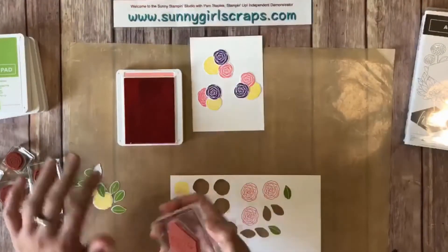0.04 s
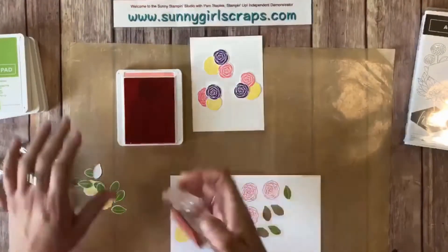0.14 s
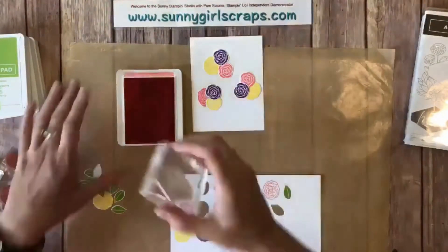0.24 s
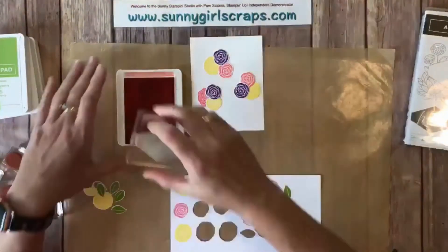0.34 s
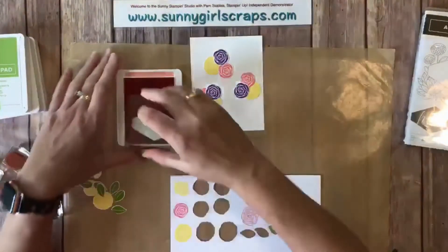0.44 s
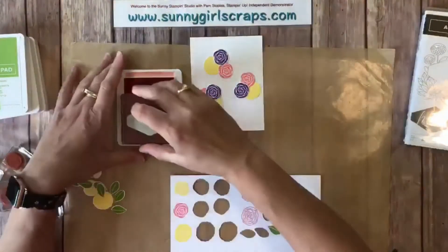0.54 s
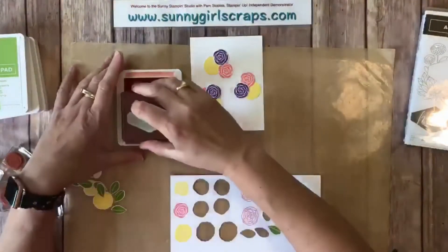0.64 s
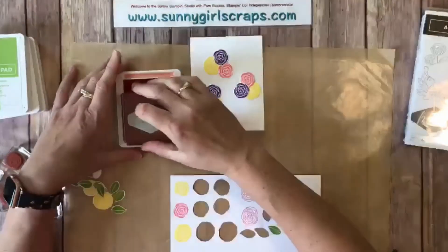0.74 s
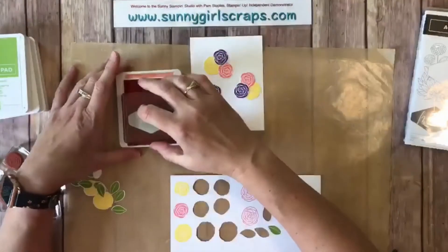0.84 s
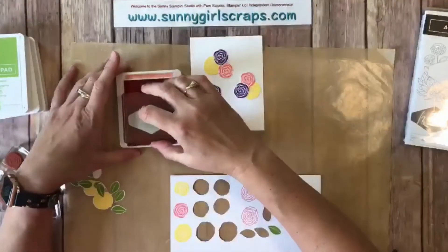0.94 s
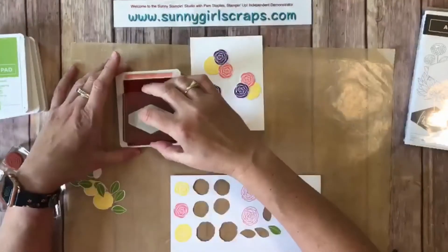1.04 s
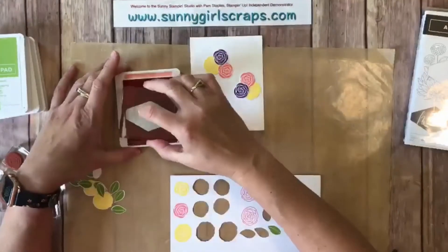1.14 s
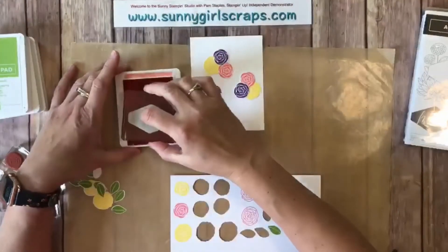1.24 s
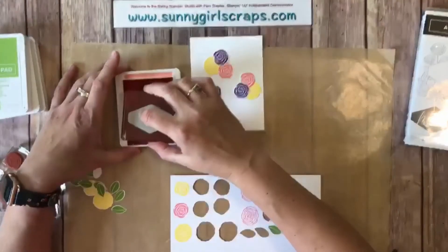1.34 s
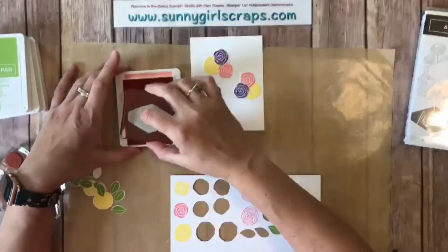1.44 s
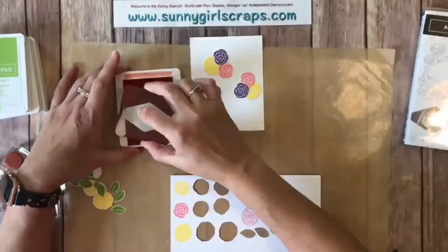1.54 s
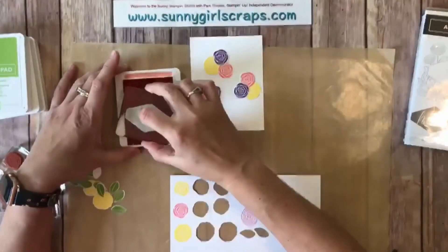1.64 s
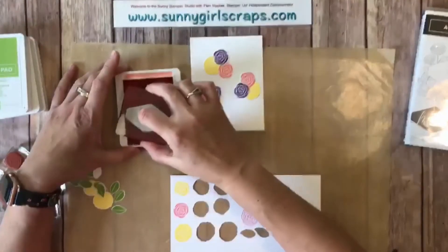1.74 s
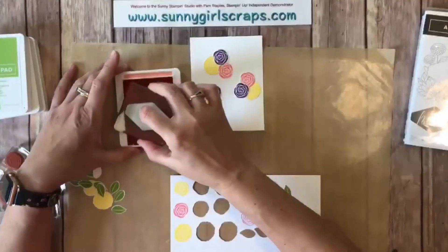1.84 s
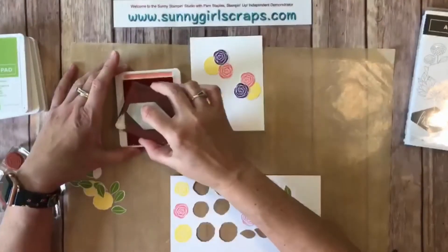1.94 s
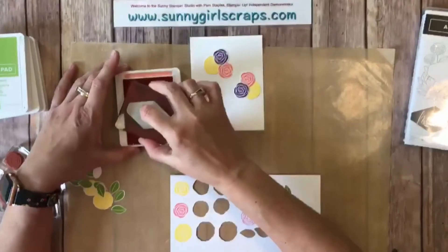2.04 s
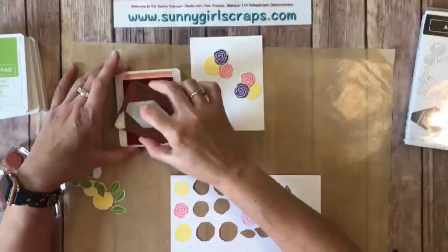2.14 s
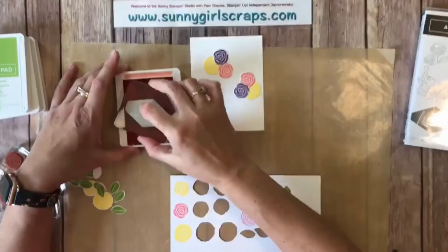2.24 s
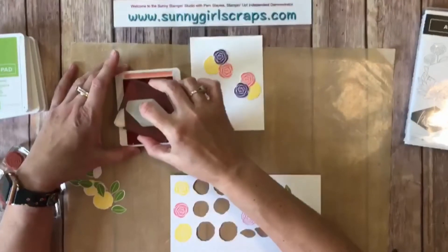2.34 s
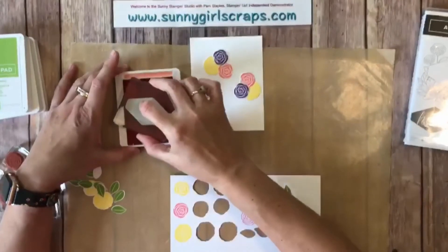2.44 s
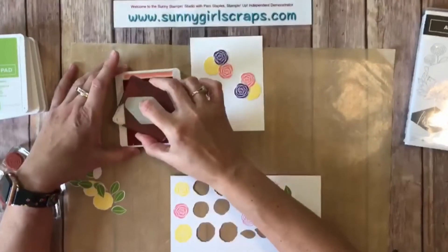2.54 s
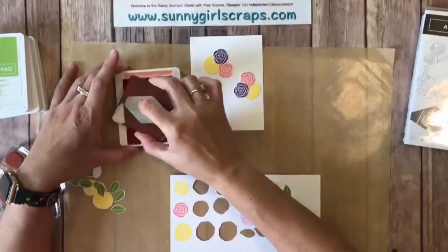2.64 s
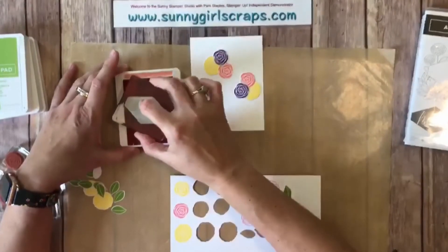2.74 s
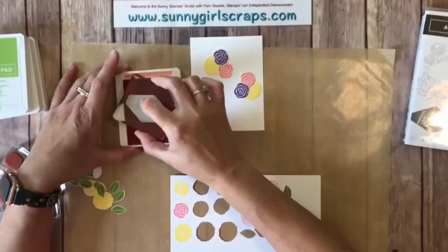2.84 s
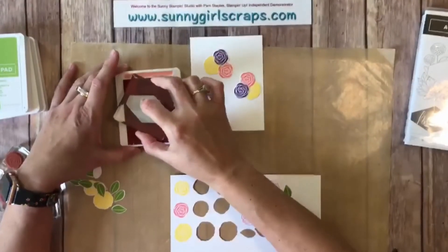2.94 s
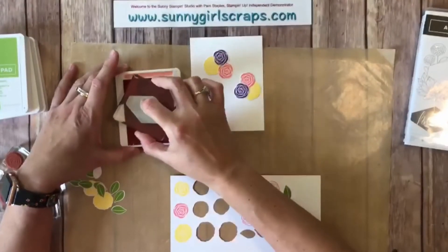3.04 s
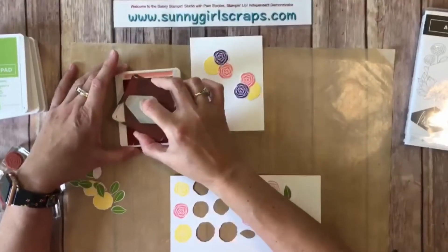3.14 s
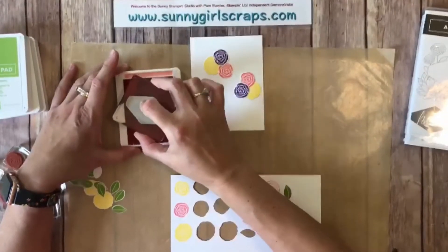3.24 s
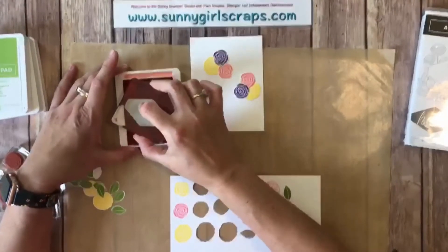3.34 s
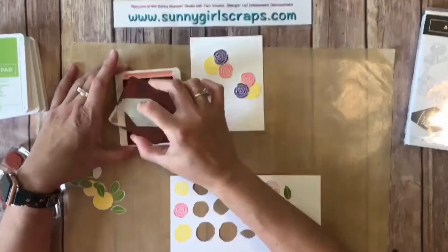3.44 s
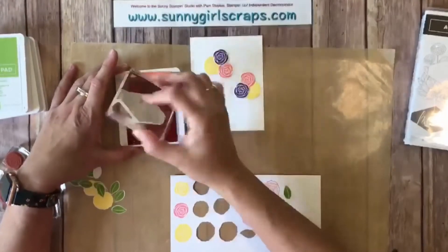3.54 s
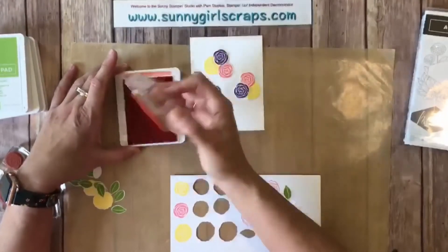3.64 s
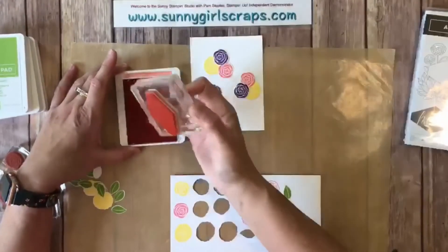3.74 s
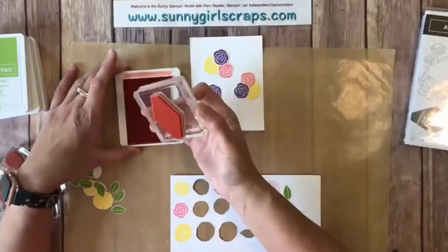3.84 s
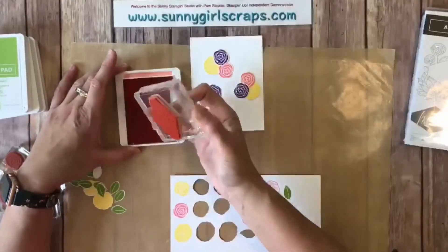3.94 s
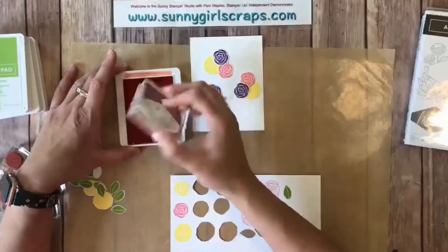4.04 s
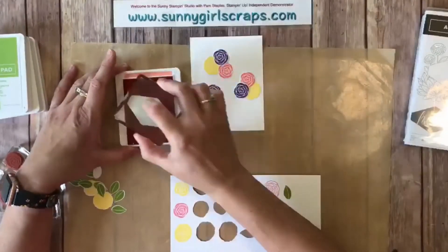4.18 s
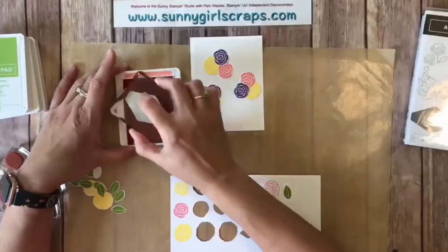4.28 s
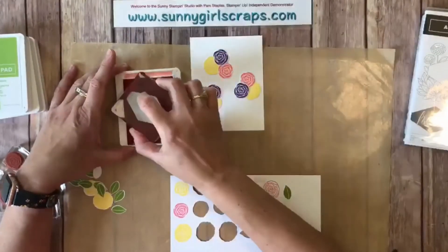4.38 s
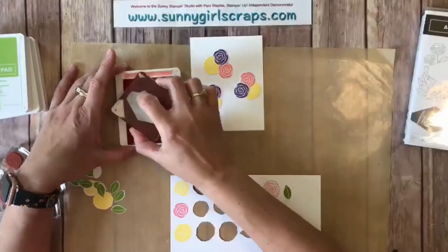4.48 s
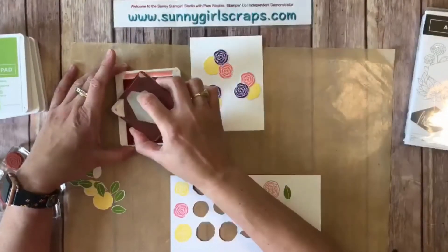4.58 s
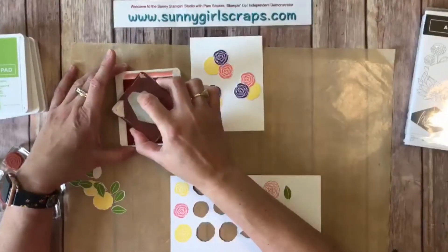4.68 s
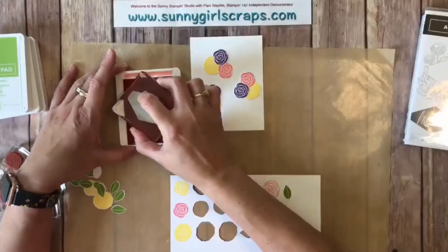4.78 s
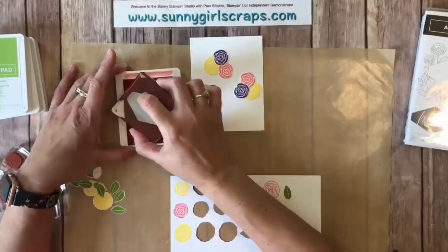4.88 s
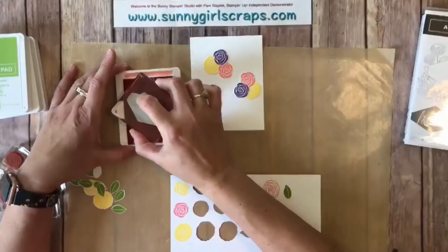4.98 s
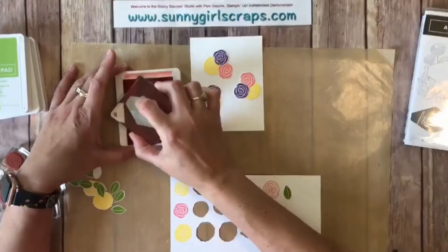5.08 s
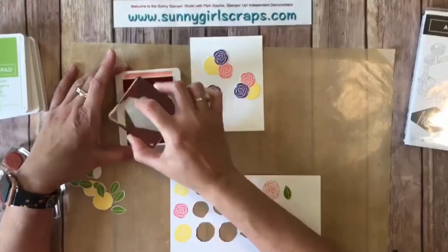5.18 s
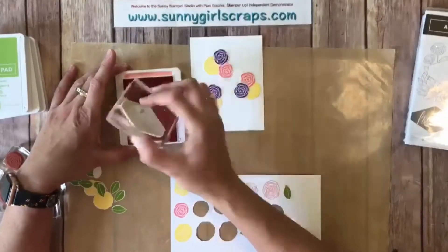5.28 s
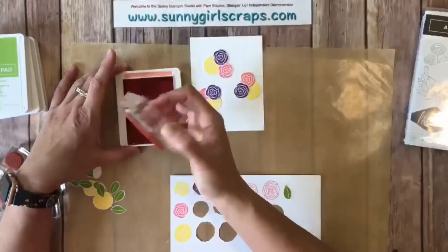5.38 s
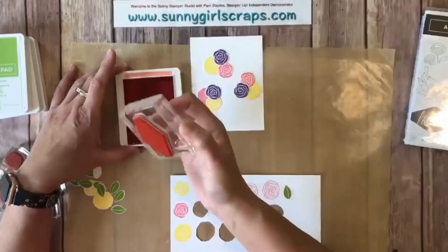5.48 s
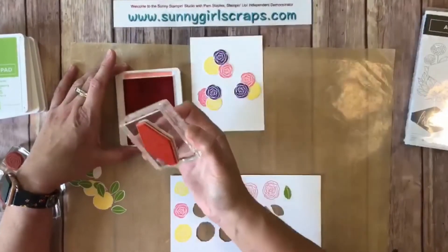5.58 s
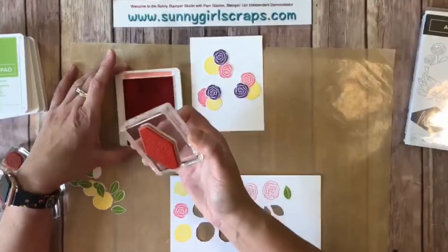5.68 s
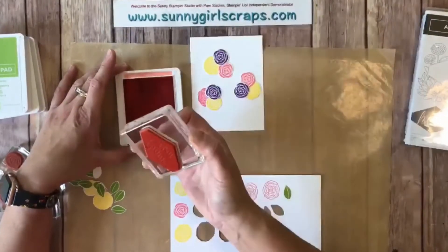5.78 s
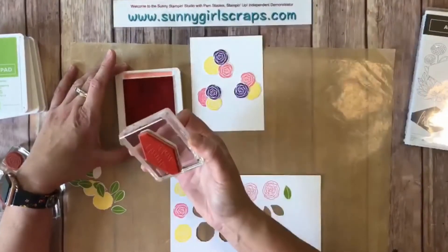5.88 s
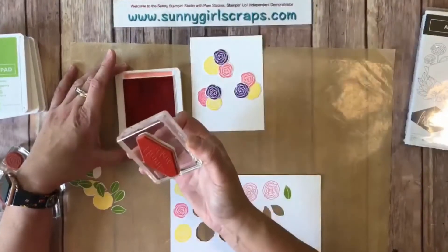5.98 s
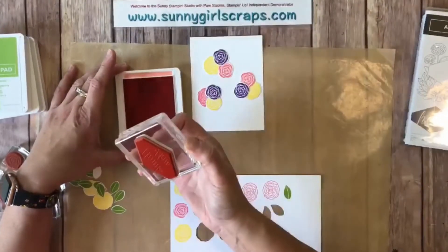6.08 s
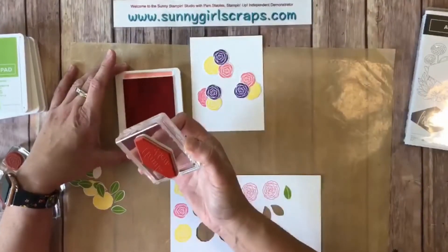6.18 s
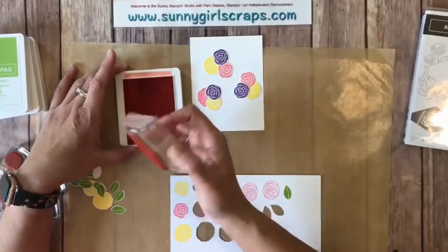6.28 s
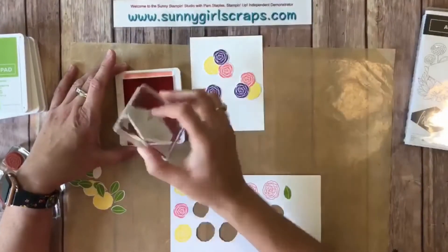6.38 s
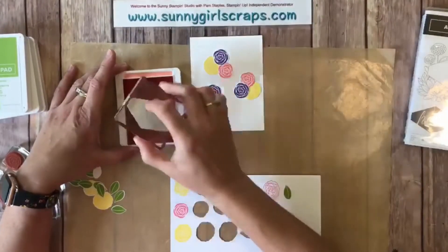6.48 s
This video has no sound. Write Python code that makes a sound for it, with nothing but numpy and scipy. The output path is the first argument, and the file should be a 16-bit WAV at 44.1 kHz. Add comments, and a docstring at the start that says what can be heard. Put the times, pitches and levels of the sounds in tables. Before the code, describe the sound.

In a small room with a faintly humming fan, a hand slides softly over a mat. A rubber stamp is then dabbed on an ink pad, each dab a dull table thump with a light plastic knock and a tiny wet squish. The dabs speed up, with faint sticky crackles between them, pause while fingers turn the block, then return four more times. The thumps carry through the microphone's mount, sounding close and deep.

```python
"""Inking a rubber stamp

A rubber stamp on an acrylic block is dabbed again and again onto a soft ink pad. Each dab squishes the
foam, knocks the pad's plastic case and thumps the table, which shakes the phone mounted above it.
Sticky ink crackles as the stamp lifts, a hand slides over the mat, and fingers turn the block over.
A fan hums in the small room."""
import sys
import numpy as np
from scipy import signal
from scipy.fft import rfft, irfft, next_fast_len
from scipy.io import wavfile
from scipy.ndimage import uniform_filter1d

SR = 44100
rng = np.random.default_rng(int(sys.argv[2]) if len(sys.argv) > 2 else 0)


def wrap_up_sound(samples):
    """Save the sound to the file named by the first command line argument, as 16-bit audio."""
    columns = np.atleast_2d(samples).T
    # keep every value between -1 and 1, then stretch to whole-number steps
    tamed = np.clip(columns, -1, 1)
    steps = np.round(tamed * 32767).astype(np.int16)
    wavfile.write(sys.argv[1], SR, steps)


N = 287435
T = np.arange(N) / SR
EVENT_T = T[:16384]  # the clock for one short sound, in seconds
USUAL_THUMP_DB, USUAL_KNOCK_DB = -30.5, -45  # an ordinary dab


def gain(db):
    """Turn decibels into a multiplier."""
    return 10 ** (np.asarray(db) / 20)


def normalize(x):
    """Scale a sound to an average (rms) size of 1."""
    return x / np.std(x)


def add(out, x, start_s):
    """Mix x into out, beginning at start_s."""
    i = max(int(round(start_s * SR)), 0)
    out[i:i + len(x)] += x[:N - i]


def noise(colour, size=len(EVENT_T)):
    """Noise whose lows and highs follow a list of (pitch_hz, level_db) points."""
    pitch_hz, level_db = np.transpose(colour)
    bin_hz = np.fft.rfftfreq(size, 1 / SR) + 1
    curve_db = np.interp(np.log(bin_hz), np.log(pitch_hz), level_db)
    return normalize(irfft(rfft(rng.standard_normal(size)) * gain(curve_db), size))


def ringing_noise(rings, size=len(EVENT_T)):
    """Noise passed through an object that rings at a few pitches."""
    padded = next_fast_len(size)
    f = np.fft.rfftfreq(padded, 1 / SR) + 1
    response = sum(gain(db) / (1 + 1j * (f * f - hz * hz) / (f * width)) for hz, width, db in rings)
    return normalize(irfft(rfft(rng.standard_normal(size), padded) * response, padded)[:size])


def wander(rate_hz):
    """A smooth random drift, mostly between -1 and 1."""
    points = rng.standard_normal(512)
    return uniform_filter1d(np.interp(T * rate_hz, np.arange(len(points)), points), int(SR / rate_hz))


def arch(length_s):
    """The shape of a smooth movement: up, then down again."""
    return np.sin(np.pi * np.arange(0, length_s, 1 / SR) / length_s)


def soft_hit(rise_s, decay_s, steepness):
    """The shape of a cushioned hit: it swells while the foam gives way, then dies."""
    swell = 1 - np.exp(-(EVENT_T / rise_s) ** steepness)
    return swell * np.exp(-(EVENT_T - rise_s) / decay_s)


# the fan's low rumble: pitch_hz, level_db
RUMBLE_COLOUR = [(25, -56), (55, -1), (85, 2), (120, 0.5), (150, 0), (185, -3), (235, -2), (290, -10.5),
                 (380, -21.5), (600, -70), (1500, -50.5)]
# the fan's faint tones: pitch_hz, level_db
FAN_TONES = [(205.5, -71.5), (855, -84), (2282, -101)]
# the room's steady hiss: pitch_hz, level_db
HISS_COLOUR = [(20, -37), (35, 1), (55, 19), (90, 6.5), (170, 3.5), (300, 7), (400, 1.5), (520, -3),
               (850, -4.5), (1500, -7), (3000, -12), (7500, -17), (8500, -16), (10000, -18.5), (16000, -20)]


def background(hum_db=-62, usual_dip_db=7, dip_s=0.43):
    """Fan tones and hiss carry on, while electric hum and fan rumble dip briefly after each thump."""
    dip_db = np.zeros(N)
    for start_s, thump_db, _ in DAB_HITS:
        add(dip_db, usual_dip_db * gain(thump_db - USUAL_THUMP_DB) * arch(dip_s), start_s)
    mains = np.sqrt(2) * np.sin(2 * np.pi * 120 * T + .25 * wander(3))
    rumble = gain(-1) * noise(RUMBLE_COLOUR, N)
    hum = gain(hum_db - dip_db) * (rumble + gain(-2.5 + 3.1 * wander(5.5)) * mains)
    tones = np.zeros(N)
    for pitch_hz, level_db in FAN_TONES:
        loudness = np.sqrt(2) * gain(level_db + 2 * wander(3.98))
        tones += loudness * np.sin(2 * np.pi * pitch_hz * T + 0.93 * wander(5.1))
    return hum + tones + gain(-65.5) * noise(HISS_COLOUR, N)


def room_echo(x, fade_s=0.3, echo_db=-15):
    """A small furnished room sends back many dull echoes that blur together."""
    tail = noise([(60, -7), (250, 6.5), (1500, 12), (12000, -7)])
    tail *= gain(-60 * EVENT_T / fade_s) * (EVENT_T > .005)
    return gain(echo_db) * signal.fftconvolve(x, tail / np.linalg.norm(tail))[:N]


# hand and sleeve moving over the mat: start_s, length_s, level_db
HAND_SLIDES = [(0, 0.058, -64.5), (0.206, 0.373, -68)]
# the hiss of sliding skin: pitch_hz, level_db
SKIN_COLOUR = [(1000, -12), (3000, -7), (7000, -10), (11000, -9), (15000, -5.5)]


def hand_slides():
    """Skin slides on the mat with an uneven hiss that swells and fades."""
    loudness = np.zeros(N)
    for start_s, length_s, level_db in HAND_SLIDES:
        add(loudness, gain(level_db) * arch(length_s), start_s)
    return loudness * gain(0.47 * wander(54)) * noise(SKIN_COLOUR, N)


# where the acrylic block rings: pitch_hz, width_hz, level_db
BLOCK_RINGS = [(1400, 300, 0), (5650, 600, -9)]


def finger_grip(start_s=3.465, knock_db=-63.5, decay_s=0.021, rub_db=-76.5, rub_s=.33):
    """Fingers knock the block, then rub it as they turn it; rubbing stirs only its lowest ring."""
    out = np.zeros(N)
    knock = ringing_noise(BLOCK_RINGS) * np.exp(-EVENT_T / decay_s)
    add(out, gain(knock_db) * knock, start_s)
    speed = arch(rub_s)
    rub = ringing_noise(BLOCK_RINGS[:1], N)[:len(speed)] * speed
    add(out, gain(rub_db) * rub, start_s)
    return out


# soft, hollow sounds between dabs: start_s, level_db
SOFT_LIFTS = [(1.372, -67), (1.415, -67), (2.745, -68.5), (2.885, -72), (3.177, -64.5), (3.325, -67),
              (5.055, -66.5), (5.205, -67)]
# the dull suck of one lift: pitch_hz, level_db
SUCK_COLOUR = [(250, -2.5), (500, -3.5), (740, 4), (1000, -14), (2000, -15.5), (5000, -31)]


def soft_lifts(swell_s=0.0079):
    """Soft, hollow sounds between dabs, mostly the wet stamp lifting off the pad."""
    out = np.zeros(N)
    shape = EVENT_T / swell_s * np.exp(1 - EVENT_T / swell_s)
    for start_s, level_db in SOFT_LIFTS:
        add(out, gain(level_db) * noise(SUCK_COLOUR) * shape, start_s)
    return out


# the crackle of sticky ink: pitch_hz, level_db
INK_COLOUR = [(300, 14), (1000, 6), (2100, 3.5), (3000, -1.5), (4200, -2.5), (5500, -0.5), (7000, -9),
              (9000, -1.5), (12000, -15), (16000, -10)]


def crackle(decay_s, spread_db):
    """Tiny threads of ink snap in a burst that dies away."""
    grain_db = spread_db * rng.standard_normal(len(EVENT_T) // 32)
    grains = normalize(np.repeat(gain(grain_db), 32))
    return noise(INK_COLOUR) * grains * np.exp(-EVENT_T / decay_s)


# the bright snap of the last ink thread: pitch_hz, level_db
SNAP_COLOUR = [(2000, -14), (5000, 5), (16000, -8)]


def ink_peels(first_db=-73.5, fade_db_per_dab=0.1, pause_s=.7, snap_s=3.732, snap_db=-61.5):
    """Sticky ink crackles as the stamp rises between quick dabs, and snaps once as it comes clear."""
    out = np.zeros(N)
    starts = [start_s for start_s, _, _ in DAB_HITS]
    for k, (start_s, gap_s) in enumerate(zip(starts, np.diff(starts))):
        if gap_s < pause_s:
            peel = gain(first_db - fade_db_per_dab * k) * crackle(decay_s=0.021, spread_db=3.5)
            add(out, peel, start_s + .625 * gap_s)  # a little past halfway to the next dab
    snap = noise(SNAP_COLOUR) * np.exp(-EVENT_T / 0.0042)
    add(out, gain(snap_db) * snap, snap_s)
    return out


# where the squeezed foam rings: pitch_hz, width_hz, level_db
FOAM_RINGS = [(756, 210, -4.5), (905, 230, -1), (1560, 280, -36)]


def wet_landings(usual_squish_db=-65, bare_tick_db=-58.5, inked_tick_db=-77.5, coating_dabs=2.1):
    """Rubber slaps and squishes the wet foam, with a tick that softens as ink coats the stamp."""
    out = np.zeros(N)
    slap = gain(4) * soft_hit(rise_s=0.0038, decay_s=0.0018, steepness=3.7)
    squeeze = soft_hit(rise_s=0.0058, decay_s=0.018, steepness=4.8)
    for k, (start_s, thump_db, knock_db) in enumerate(DAB_HITS):
        # harder dabs squish louder
        extra_db = 0.26 * (thump_db - USUAL_THUMP_DB) + 0.7 * (knock_db - USUAL_KNOCK_DB)
        squish = ringing_noise(FOAM_RINGS) * (slap + squeeze)
        add(out, gain(usual_squish_db + extra_db) * squish, start_s)
        bare_share = np.exp(-(k / coating_dabs) ** 2)
        tick_db = inked_tick_db + (bare_tick_db - inked_tick_db) * bare_share
        tick = crackle(decay_s=.0025, spread_db=3) + gain(-9) * crackle(decay_s=.02, spread_db=3)
        add(out, gain(tick_db) * tick, start_s + .004)
    return out


# the notes of the pad's plastic case: pitch_hz, level_db, decay_s
CASE_NOTES = [(232, -1, 0.013), (283.6, -2, 0.0083), (320.8, -2.5, 0.0096), (377, -15, 0.026),
              (423, -8.5, 0.0058), (463.4, -6, 0.007), (568, -15, 0.021), (660, -6, 0.0081),
              (763, -9, 0.0062)]


def case_knocks(foam_hz=281, usual_knock_hz=115, rise_cycles=4.5):
    """The case rings under the pad: low notes swell more slowly, firmer knocks reach higher notes."""
    out = np.zeros(N)
    for start_s, _, knock_db in DAB_HITS:
        reach_hz = foam_hz + usual_knock_hz * gain(knock_db - USUAL_KNOCK_DB)
        for k, (pitch_hz, level_db, decay_s) in enumerate(CASE_NOTES):
            # the hand holds the case a little differently each time
            nudge_db, detune = rng.standard_normal(2) * (0.3, 0.019)
            wave = (-1) ** k * np.sin(2 * np.pi * pitch_hz * (1 + detune) * EVENT_T)
            muffle = 1 / np.hypot(1, (pitch_hz / reach_hz) ** 2.8)
            shape = soft_hit(rise_cycles / pitch_hz, decay_s, steepness=3.4)
            add(out, gain(knock_db + level_db + nudge_db) * muffle * shape * wave, start_s)
    return out


# each dab's thump on the table and knock on the case: start_s, thump_db, knock_db
DAB_HITS = [(0.7277, -35.5, -58.5), (1.3056, -26.5, -33), (1.6619, -25.5, -40.5), (1.9966, -30.5, -45.5),
            (2.217, -30, -40), (2.3678, -35, -50.5), (2.5091, -39.5, -55), (2.6602, -28.5, -50.5),
            (2.8018, -38, -58), (2.9499, -29, -45), (3.088, -50.5, -84), (3.2510, -31, -52),
            (3.3935, -27, -41), (4.4367, -29, -49), (4.684, -33, -55), (4.9810, -30, -47.5),
            (5.129, -29.5, -48.5)]


def table_thumps(start_hz=203.2, end_hz=50, glide_s=0.016, usual_decay_s=.0152, echo_s=0.0153):
    """The table top bends in waves; the high ones arrive first, so every thump falls in pitch."""
    out = np.zeros(N)
    pitch_hz = end_hz + (start_hz - end_hz) * np.exp(-EVENT_T / glide_s)
    hand_stop = np.exp(-(EVENT_T / 0.057) ** 4)  # the hand's weight stops the last slow swings
    wave = -np.sin(2 * np.pi * np.cumsum(pitch_hz) / SR) * hand_stop
    for start_s, thump_db, _ in DAB_HITS:
        # a gentler dab sinks into the foam for longer
        decay_s = usual_decay_s * 2 ** ((USUAL_THUMP_DB - thump_db) / 21.5)
        thump = gain(thump_db) * soft_hit(rise_s=0.015, decay_s=decay_s, steepness=2.11) * wave
        add(out, thump, start_s)
        add(out, gain(-11) * thump, start_s + echo_s)  # bounces back from the table's edge
    return out


def scene():
    """The thumps travel through the phone's mount; the knocks, ink and hand also echo in the room."""
    in_air = case_knocks() + wet_landings() + ink_peels() + hand_slides() + soft_lifts() + finger_grip()
    return (table_thumps() + in_air + room_echo(in_air) + background())[None]


def record(dry, top_hz=15800):
    """The phone cuts off the very highest sounds."""
    return signal.sosfilt(signal.ellip(10, .2, 70, top_hz, fs=SR, output="sos"), dry)


dry = scene()
out = record(dry)
wrap_up_sound(out)
```